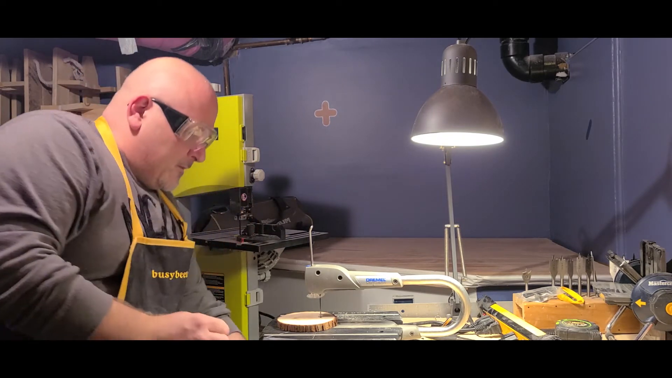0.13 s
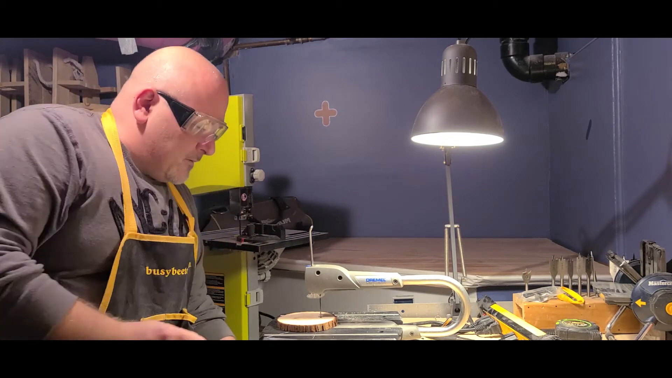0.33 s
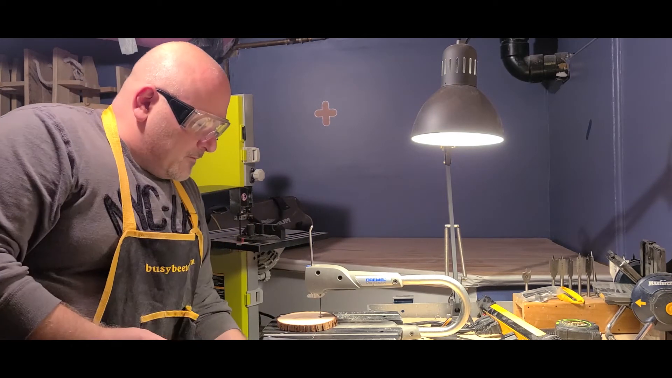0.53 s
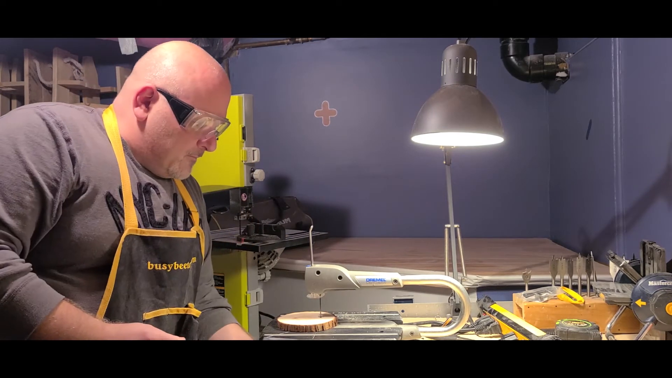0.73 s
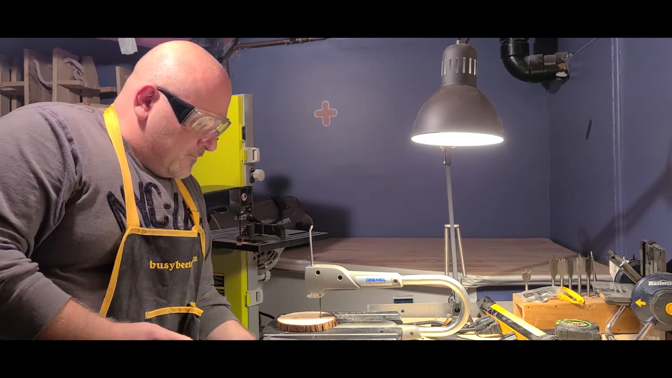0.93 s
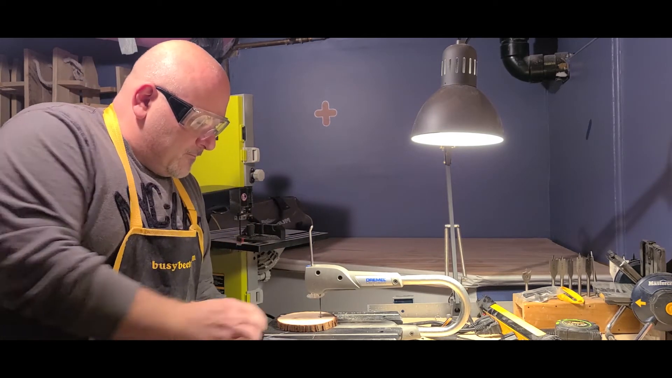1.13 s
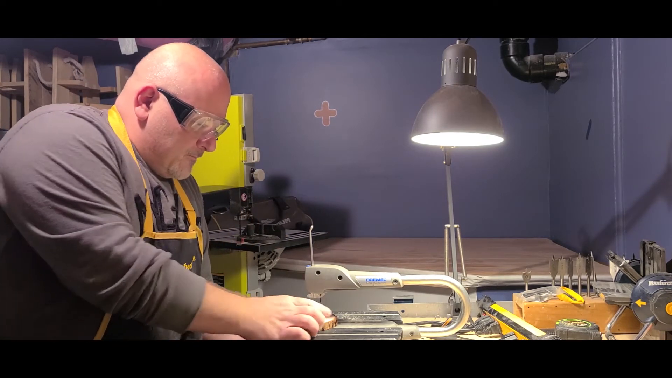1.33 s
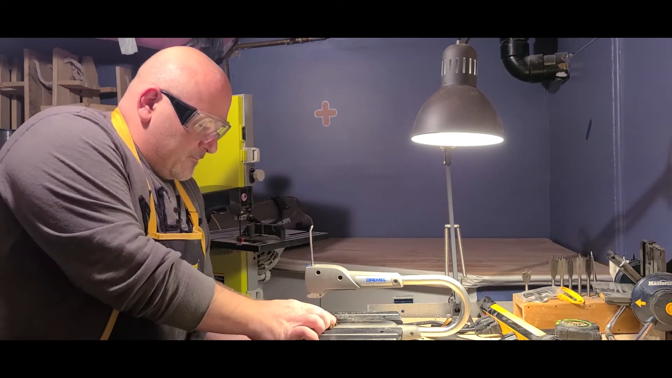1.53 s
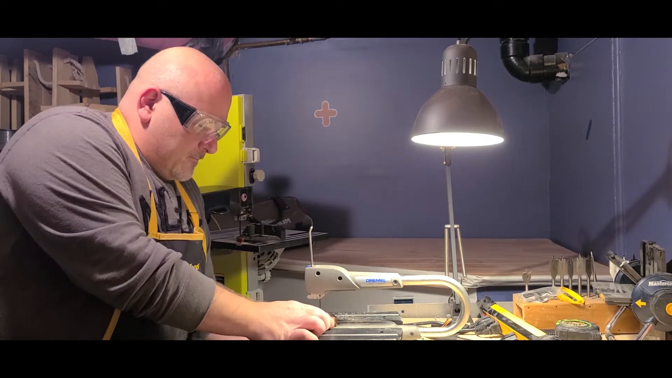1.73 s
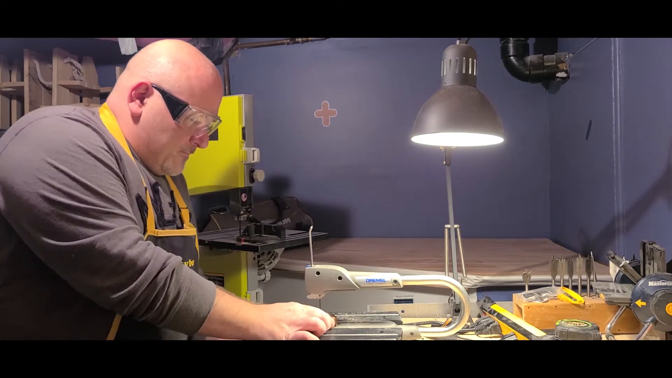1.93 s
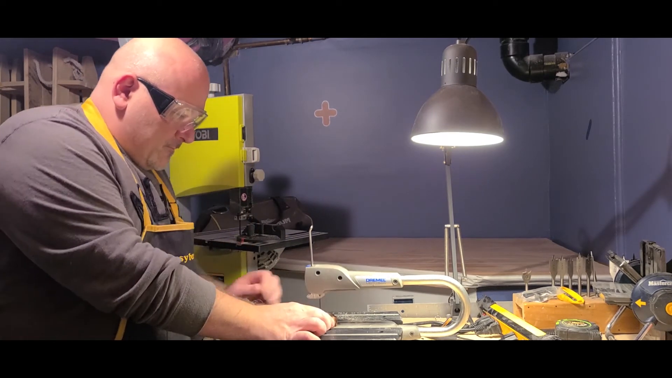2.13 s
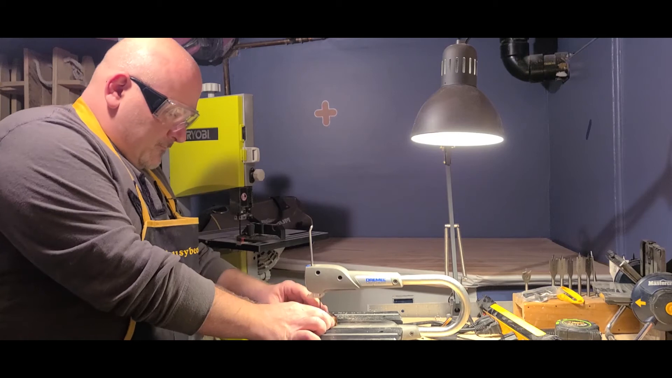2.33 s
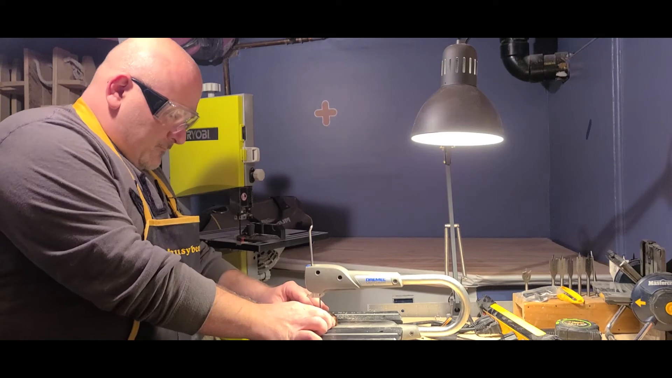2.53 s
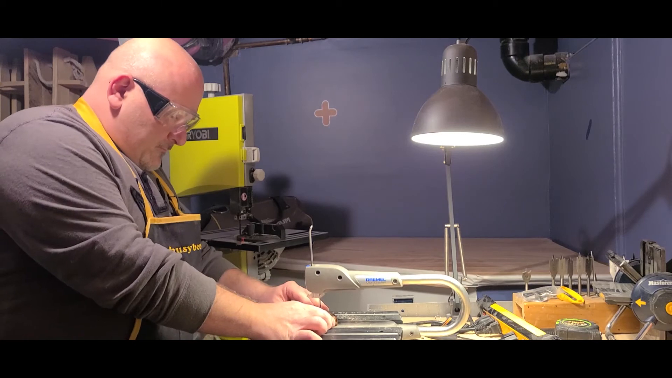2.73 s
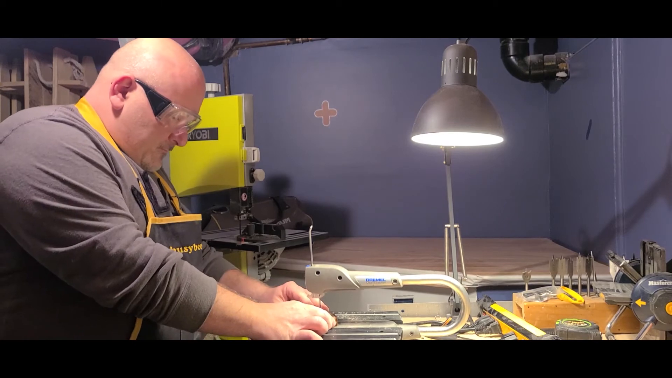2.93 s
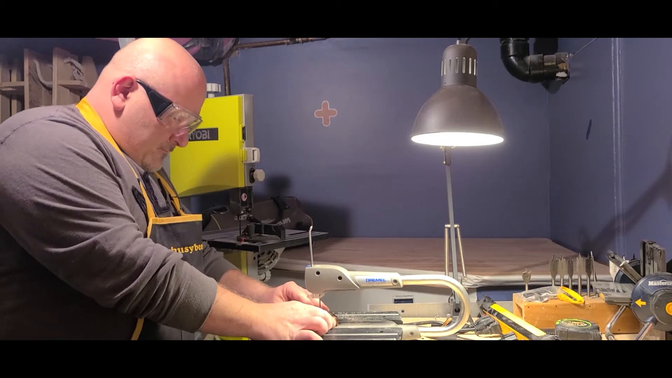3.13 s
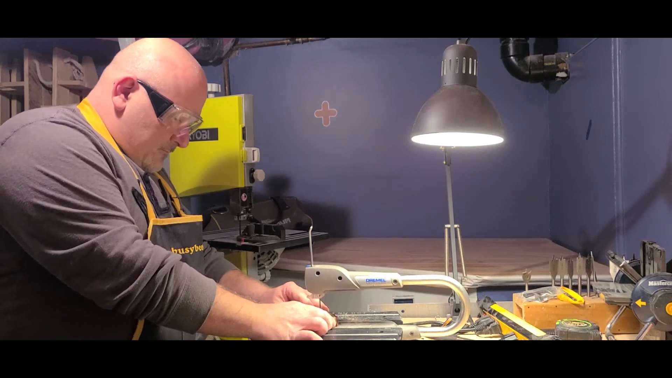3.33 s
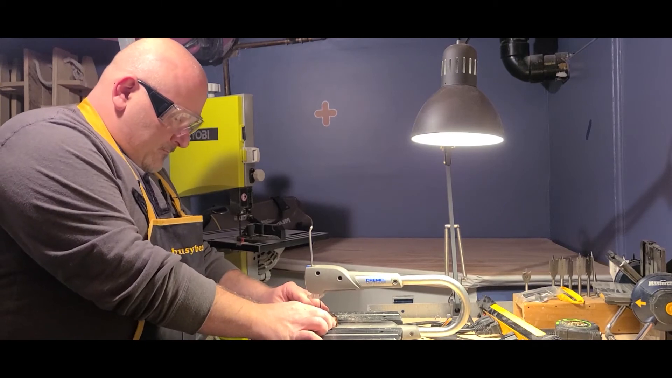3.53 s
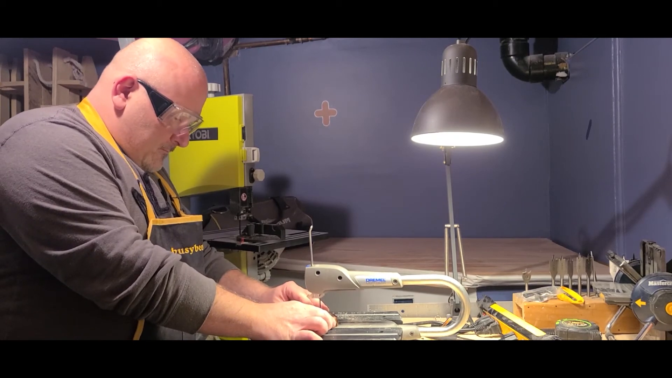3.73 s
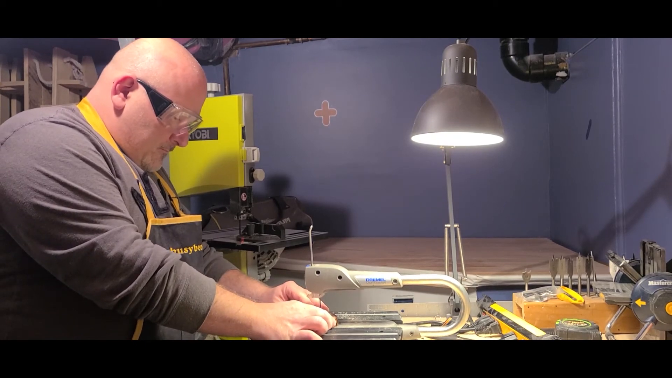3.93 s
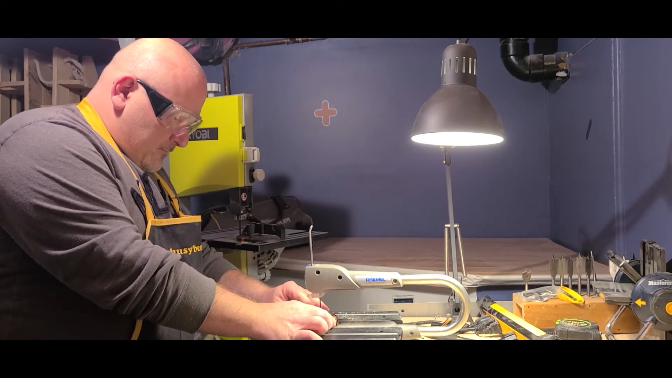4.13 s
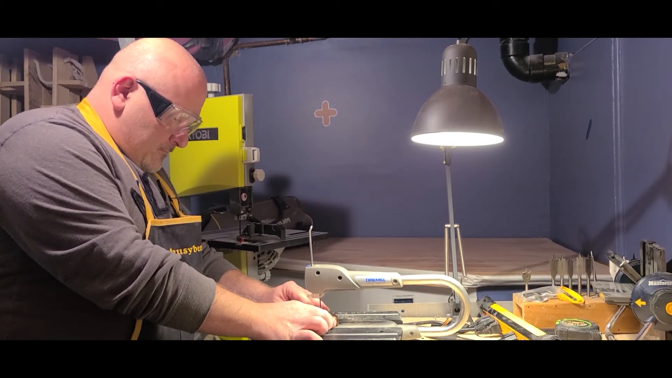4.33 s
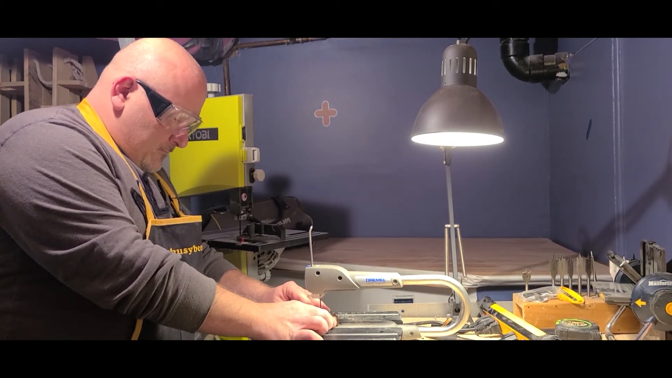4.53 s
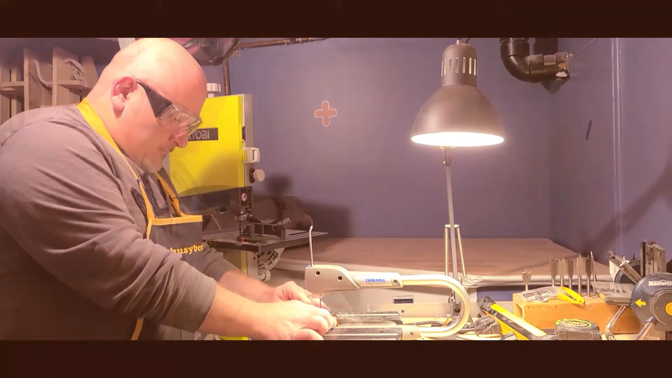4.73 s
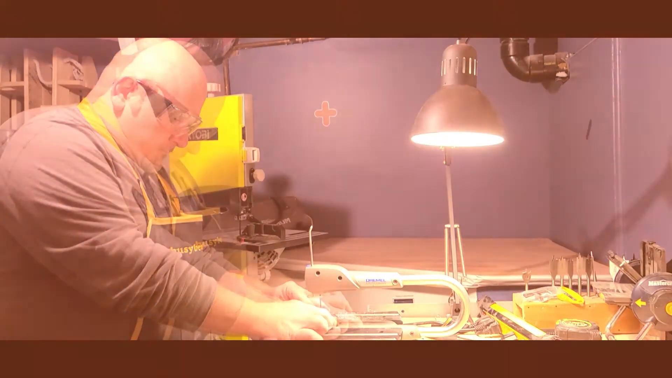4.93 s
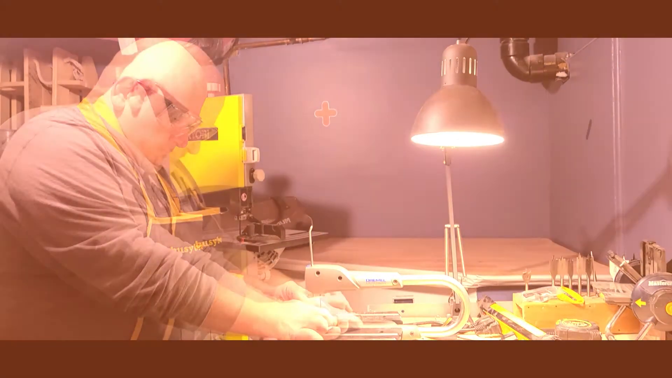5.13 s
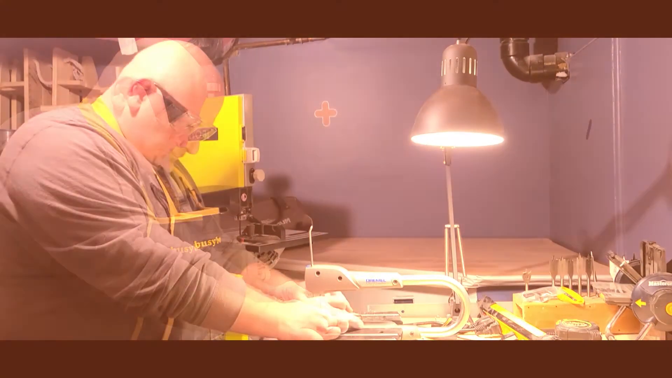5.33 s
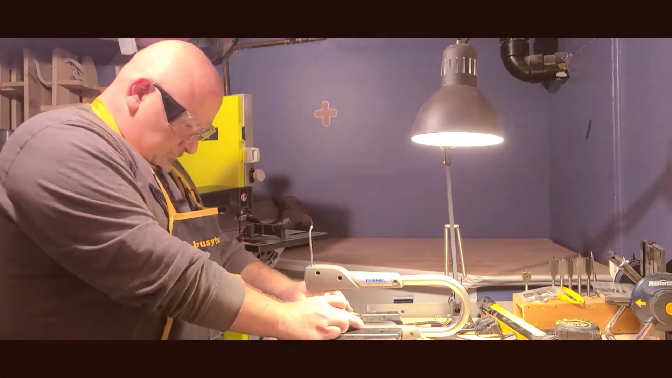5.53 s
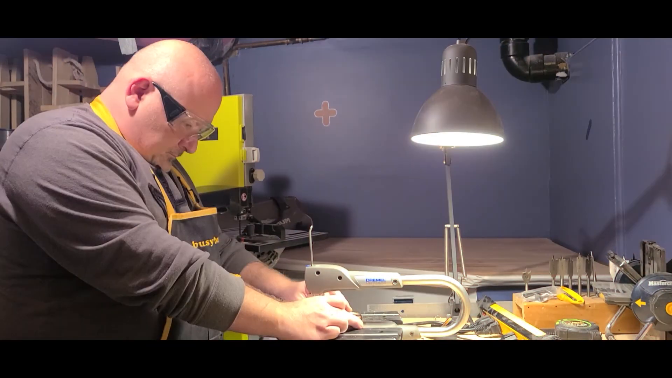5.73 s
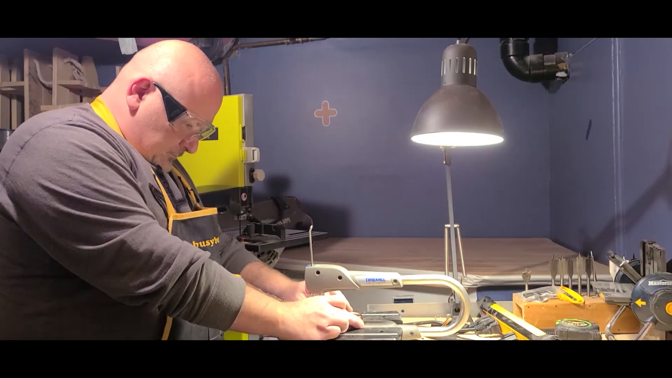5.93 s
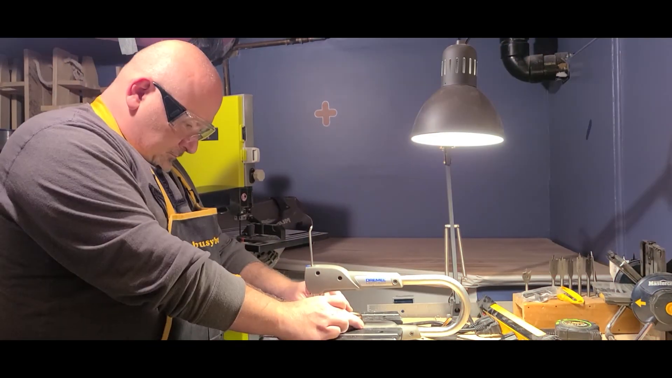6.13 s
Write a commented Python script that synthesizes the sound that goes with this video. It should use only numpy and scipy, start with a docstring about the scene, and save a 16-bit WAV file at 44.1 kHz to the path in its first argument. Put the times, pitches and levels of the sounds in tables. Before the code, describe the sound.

A quiet workshop with faint low room tone and a short, dense echo, heard close in stereo. From 0.07 to 0.3 seconds, soft low thuds on a bench come with clacks, tiny metal clicks and a sleeve swish; weaker bumps and a dull apron rustle continue to about 0.9, with two faint bumps around 1.3 to 1.4. At 1.55 a switch snaps and a motor howls rapidly up to speed. By 1.8 a scroll saw runs steadily at about 29 strokes a second: low bench hum, rattle, metallic chatter, fluttering high whine and a wavering blade note, growing gradually. Light rasping rises near 3.2, table buzz near 4.1, and a strong hollow rasp around 4.6. At 5.09 everything vanishes for about 0.02 seconds. The saw resumes with less low hum; brighter, harsher wood rasps swell at 5.45 and 6.0, slowing the motor slightly.

```python
"""Bumps on a workshop bench come first, with clacks, small clicks and the swish of clothes; then a scroll saw
is switched on and howls up to 29 strokes a second. Its arm shakes the bench, and its drive whines and chatters
with the crank. The blade sings and rasps through a wood slice all through the turn, somewhat harder on the
downstroke. The stronger pushes slow the motor a little, and most set the table buzzing. The sound drops out
once, very briefly, and many layers have other levels afterwards."""
import sys
import numpy as np
from scipy import signal
from scipy.fft import rfft, irfft, next_fast_len
from scipy.io import wavfile
from scipy.ndimage import uniform_filter1d, map_coordinates

SR = 44100
rng = np.random.default_rng(int(sys.argv[2]) if len(sys.argv) > 2 else 0)


def put_to_file(sound):
    """Save the sound as 16-bit audio at rate SR, in the file named by the first command-line argument."""
    columns = np.atleast_2d(sound).T  # one column per channel
    safe = np.clip(columns, -1, 1)
    whole_steps = np.round(safe * 32767)
    wavfile.write(sys.argv[1], SR, whole_steps.astype(np.int16))


N = 273420
TIME = np.arange(N) / SR

SWITCH_ON_S = 1.548
DOWNSTROKE_S = (4.585, 6.024)  # a downstroke before and one after the dropout: turns count from these
DROPOUT_S = (5.086, 5.108)  # start and end of the brief silence
TOP_HZ = 15850  # nothing is kept above this

# How alike left and right are: pitch_hz, likeness (1 = the same)
ALIKE = [(130, .985), (200, .93), (300, .5), (640, .4), (1400, .05), (5000, 0), (7500, .75), (15000, .65)]
# How much louder left is than right: pitch_hz, left_minus_right_db
LEAN = [(60, -3.5), (92, -3.5), (140, -2.0), (210, -1.0), (330, 2.5), (500, -2.0), (770, -3.0), (1170, 0.5),
        (1790, 2.5), (2740, 2.0), (4190, 1.0), (6410, 7.0), (9810, -2.5), (15000, -0.5)]
# Decay of the workshop's echo: pitch_hz, t60_s (time to fall by 60 dB)
WORKSHOP = [(150, 0.1), (1500, 0.24), (12000, 0.054)]
# Tone colour of the quiet room: pitch_hz, density_db (per Hz)
ROOM_TONE = [(15, -33), (25, 0), (64, 0), (120, -16), (270, -10.5), (887, -23), (2280, -29), (2480, -27),
             (2910, -25.5), (3720, -33), (5280, -31.5), (6380, -25), (8590, -41), (16000, -37)]

# Hands bump the bench and the saw: start_s, thud_db, favoured_pitch_hz, clack_db, clack_t60_s
BUMPS = [(0.072, -43, 130, -49.5, 0.4), (0.11, -35.5, 62, -53, 0.17), (.126, -40, 140, -53, .12),
         (0.189, -36, 50, -62, .25), (.275, -39, 74, -64, 0.22), (0.499, -54, 65, -70, .2),
         (.544, -46, 88, -70, .2), (.635, -53, 90, -60, 0.27), (0.698, -53, 110, -73, .2),
         (0.799, -54, 68, -66, 0.24), (0.844, -60, 90, -62, 0.2), (1.304, -53, 75, -83, .1),
         (1.405, -61, 70, -80, .1)]
# Low notes of the bench: pitch_hz, level_db, t60_s
THUD = [(50, -2, 0.16), (74, 0.5, 0.23), (131, -1, .15), (156, 1, 0.23), (249.3, -0.5, 0.37)]
# Tone colour of the light clacks: pitch_hz, density_db (per Hz)
CLACK = [(100, 7), (280, 3), (800, 2), (1100, -13), (2300, -10), (3100, -29), (4200, -22), (7000, -31),
         (15000, -46)]
# Loose metal parts click: start_s, level_db, t60_s
CLICKS = [(.0705, -44.5, .02), (.079, -50, .09), (.11, -59, .04), (.192, -58, .035), (.229, -62, .03),
          (.254, -61, .03), (.627, -70, .03), (.648, -71, .03), (.844, -67, .03)]
# Tone colour of those clicks: pitch_hz, density_db (per Hz)
METAL = [(200, -18), (1000, -8), (1900, -3), (2600, 0), (3000, 10), (3600, -10), (4700, -5), (6000, -16),
         (8000, -21), (15000, -30)]
# A sleeve brushes past: time_s, level_db
SLEEVE = [(.1, -90), (.17, -66), (.21, -54), (.26, -55.5), (.33, -65.5), (.4, -81)]
# Tone colour of the sleeve: pitch_hz, density_db (per Hz)
CLOTH = [(200, 2.5), (900, -2), (1400, 0), (2600, -16), (6000, -22), (15000, -44)]
# An apron rustles dully: time_s, level_db
APRON = [(.58, -86), (.65, -64), (.76, -72), (.85, -65), (.96, -85)]
# Tone colour of the apron: pitch_hz, density_db (per Hz)
CANVAS = [(100, -10), (250, 8), (480, 0), (800, -8.5), (1200, -19), (3000, -30), (12000, -45)]
BLOW_OCTAVES = 0.72  # bench notes this far from a blow's pitch ring half as strongly

# Tone colour of the switch: pitch_hz, density_db (per Hz)
SNAP = [(200, -16), (1500, -15), (3000, 4), (5500, 2), (9000, 3), (16000, -10)]
# Frame resonances that the motor sweeps through: pitch_hz, width_hz, level_db
FRAME = [(774, 70, -25.5), (855, 53, -28), (1315, 30, -22), (1720, 93, -36), (2700, 260, -36),
         (2960, 200, -35)]
HOWL_DELAY_S, HOWL_HOLD_S, HOWL_RELEASE_S = 0.013, 0.17, 0.089  # the motor strains briefly after the switch

# The crank. Pairs here and below hold the value before and after the dropout
STROKE_HZ = 29.2  # typical rate, for placing harmonics and sizing one turn of noise
IDLE_HZ, SAG_HZ, SPIN_UP_S = (29.385, 29.43), .41, .03  # free speed, drop at full load, run-up time constant
FADE_IN_DB, FADE_IN_S = 7.5, 0.89  # the running saw starts this much softer; time constant of its growth
# Share of the contact noise that repeats on every turn, and the pitch where that share halves
REPEAT, REPEAT_HZ = .62, 2600

# A loose panel hums: time_s, level_db
PANEL = [(1.76, -75), (1.85, -44.5), (2.85, -45.5), (3.05, -53), (5.6, -50)]

# Shaking of arm and bench: crank_multiple, before_dropout_db, after_dropout_db, gain_per_effort_db
SHAKE = [(2, -45, -50, 2), (3, -30.3, -37.5, 4.5), (4, -35, -43, .5), (5, -40.5, -51, 5),
         (6, -48, -43, 2.5)]
# Tone colour of the bench's rattle: pitch_hz, density_db (per Hz)
BENCH = [(35, -45), (90, 8.5), (170, -3.5), (240, -11), (290, -4.5), (380, -1), (480, -5), (570, -8.5),
         (900, -8), (2000, -34)]
SWAY_DB, RATTLE_DB = (-47.5, -57), (-38, -38.5)
RATTLE_IDLE_DB, RATTLE_KNEE = -6, 0.13  # softer by this at idle; the load near which it starts in earnest
SHAKE_DELAY_S, SHAKE_RISE_S, SHAKE_START_DB = 0.2, 0.033, -8.5  # the hum is softer at first, then rises
SHAKE_GROWS, SMEAR = (1, 1.7), .3  # effort per load; how far the bench smears a jolt over the turn

# Tone colour of bearings and links: pitch_hz, density_db (per Hz)
CHATTER = [(150, -9.5), (550, -5.5), (720, 1), (1000, -8.5), (1280, 2), (2200, -6), (3200, 0.5),
           (4200, -4.5), (5200, -6.5), (6200, -8.5), (8100, -15.5), (10300, -14.5), (13000, -18.5),
           (15800, -25.5)]
CHATTER_DB, CHATTER_LOAD_DB = (-23, -25.5), -2  # level at idle, change at full load
CHATTER_RISE_S, CHATTER_START_DB = 0.026, -18  # it starts this much softer and rises

# Partials of the drive's whine: crank_multiple, crest_db, ripple_rad, blur_rad, pitch_swing (share),
# highest_at (share of a turn)
PARTIALS = [(51, -27.5, 0.046, 0.15, 0.015, 0.15), (100, -24, 0.089, 0.38, 0.01, 0.3),
            (152, -26.5, 0.27, 0.56, 0.0054, 0.14), (162, -37, 0.097, 0.42, 0.0082, 0.13),
            (202, -27.5, 0.1, .45, .013, 0.18), (207, -40.5, .34, .62, 0.0098, 0.13),
            (250, -39.5, 0.21, .91, .009, .15), (257, -42, .44, 1, 0.0077, 0.23),
            (300, -43, .22, 0.71, 0.0095, 0.16), (350, -47, .18, .9, 0.005, 0.11),
            (404, -38, .13, 0.59, .003, 0.13)]
# Throbs of the partials on every turn: crank_multiple, crest_at (share of a turn), width_turns, level_db,
# left_minus_right_db, gain_at_full_load_db, gain_after_dropout_db, left_right_phase_rad
SWELLS = [(51, .08, .055, -1, 1, 4, 1.5, .7), (51, .42, .045, -1, 2, -2, 2, 2.9),
          (51, .63, .08, 2, 7, -4, -1.5, 1), (51, .88, .07, 0, -3, 2.5, 1, .6),
          (100, .05, .06, -2, 8, 0, -3, 1), (100, .22, .07, .5, 7, -6, -5, .9),
          (100, .52, .05, -4, 1, -2, 0, 2.9), (100, .7, .06, -2, -3, -4, 4.5, 1.2),
          (100, .89, .05, -3, 3, 7, 2, 2), (152, .32, .05, -4, 2, -2, -1, 2.7),
          (152, .64, .06, -1, -1, -2, -2, 1.9), (152, .03, .09, -1, 2, -3, 0, 1.1),
          (162, .1, .25, 0, 2, -2, 0, 1.6), (202, .75, .1, 0, 13, -4, -2.5, 1.2),
          (202, .15, .11, -7.5, 6, -2, 2, 1.2), (207, .2, .2, 0, 8, -3, -1, 1.2),
          (250, .42, .14, 0, 4, 0, 0, .7), (257, 0, .12, 0, 3, -2, 0, .7), (300, .08, .1, 0, -2, -1, 1, .6),
          (300, .68, .1, -1, -2, -3, 1, .6), (350, .98, .15, 0, -2, -1, -1, .6),
          (404, .06, .09, 0, -2, -2.5, -4, .8), (404, .63, .1, -3, -2, -4, -2, .8)]
TROUGH_DB = -19  # level between the swells
WHINE_DELAY_S, WHINE_RISE_S = .065, .11

# The taut blade's own note, with an unsteady level: time_s, level_db
SING = [(1.56, -70), (1.59, -37), (1.65, -44), (2.6, -42), (2.8, -38.5), (3.1, -42), (3.16, -33),
        (3.21, -33.5), (3.24, -41), (4.1, -37.5), (4.55, -34.5), (5.06, -35), (5.15, -38.5), (6.2, -37.5)]
SING_HZ, SING_SAG_HZ, WARBLE_HZ, FLICKER_DB = 828, 38, 22, 2.6  # pitch, drop at full load, wander, flicker

# The slice is pushed into the blade, or the blade meets harder grain: peak_s, rise_s, fall_s, load (0-1),
# rasp_db, brightness (0-1), buzz_db, buzz_tilt_db (per octave)
PUSHES = [(3.19, .27, 0.76, .02, -37, 0, -57, -2), (4.15, 0.33, 0.56, 0.01, -42.5, 0.8, -31, -1),
          (4.678, 0.58, 2.5, 1, -27.5, 0.28, -31, 6.5), (4.57, 0.075, 0.061, 0.01, -32.5, 0.7, -45, 6),
          (5.452, 0.134, 0.1224, .6, -24, 0.59, -34.5, 1.5), (6.011, 0.19, 0.12, 0.84, -23, 0.84, -30.5, 1)]
PUSH_SHAPE, RASP_GROWS = 1.5, 0.93  # roundness of a push; the rasp rises as this power of it
# The table buzzes against the blade: crank_multiple, before_dropout_db, after_dropout_db
BUZZ = [(7, -1, -2), (8, 1, 2.5), (9, -4, -3), (11, -11, -3), (13, 0, -7), (15, -14, -6), (16, -5, -9),
        (19, -4, -7), (20, -11, -2), (24, -4, -6), (27, -1, -5)]
BUZZ_LINE_DB = -8.5  # a strong harmonic, relative to the whole buzz
# The slice slaps the table: at (share of a turn), level_db
SLAPS = [(.96, 0), (.32, -6), (.66, -6)]
SLAP_DB, SLAP_SCATTER_S, SLAP_SCATTER_DB = -2.5, .0006, 2  # level against the rasp; scatter in time and size
# What the slice rings with: pitch_hz, width_hz, level_db
SLICE = [(815, 90, -4), (1120, 130, -3), (1300, 130, 1), (1560, 170, -3)]
# Tone colour of the rasp when the slice sounds hollow: pitch_hz, density_db (per Hz)
HOLLOW = [(50, -47), (170, -19), (400, -4), (620, 4.5), (810, 11.5), (1000, 1), (1350, -8.5), (2000, -16.5),
          (5000, -29), (15000, -62)]
# Tone colour of the rasp when the slice sounds bright: pitch_hz, density_db (per Hz)
BRIGHT = [(50, -34), (180, -4), (320, -13), (600, -2), (850, -9), (1280, 5), (1750, -5), (2600, -7),
          (5000, -13.5), (15000, -51)]


def amp(db):
    """Decibels to gain."""
    return 10 ** (np.asarray(db) / 20)


def unit(x):
    """Scale to an average (rms) level of 1."""
    return x / np.sqrt(np.mean(x ** 2) + 1e-20)


def along(points, hz):
    """Read (pitch, value) points at any pitch, on a log axis."""
    pitch, value = np.transpose(points)
    return np.interp(np.log(hz + 1), np.log(pitch + 1), value)


def curves(rows):
    """One value per sample for each column after the time."""
    s, *columns = np.transpose(rows)
    return [np.interp(TIME, s, column) for column in columns]


def spliced(pair):
    """One value until the end of the dropout, another after it."""
    return np.where(TIME < DROPOUT_S[1], pair[0], pair[1])


def ramp(delay, length):
    """From 0 to 1, starting this long after the switch."""
    return np.clip((TIME - SWITCH_ON_S - delay) / length, 0, 1)


def decay(start, t60, attack):
    """The loudness of one blow: a quick rise, then a fall of 60 dB in t60 seconds."""
    age = np.maximum(TIME - start, 0)
    return amp(-60 * age / t60) * (1 - np.exp(-age / attack))


def wobble(rate):
    """A smooth random curve with this many random points a second."""
    coarse = np.linspace(0, N / SR, N // 10)
    points = rng.standard_normal(int(N * rate / SR) + 4)
    return np.interp(TIME, coarse, map_coordinates(points, [coarse * rate]))


def noise():
    """Two channels of white noise."""
    return rng.standard_normal((2, N))


def filtered(x, response):
    """Multiply the spectrum of x by a function of pitch."""
    size = next_fast_len(N + SR // 2)
    spectrum = rfft(x, size) * response(np.fft.rfftfreq(size, 1 / SR))
    return irfft(spectrum, size)[..., :N]


def resonate(x, modes):
    """Make x ring through resonances given as (pitch, width, level)."""
    def response(f):
        return sum(amp(db) * 1j * f * width / (hz * hz - f * f + 1j * f * width) for hz, width, db in modes)
    return filtered(x, response)


def spread(hz):
    """Half the angle by which the room sets left and right apart."""
    return np.arccos(np.clip(along(ALIKE, hz), -1, 1)) / 2


def coloured(pair, spectrum):
    """Two unrelated signals become one stereo sound of rms 1 with this tone colour."""
    def widen(hz):
        return amp(along(spectrum, hz)) * [np.cos(spread(hz)), np.sin(spread(hz))]

    def lean(hz):
        return amp(np.outer([.5, -.5], along(LEAN, hz)))

    mid, side = filtered(pair, widen)
    return unit(filtered(np.array([mid + side, mid - side]), lean))


def tone(turns, multiple, pan_db, apart=None, lag=None):
    """A stereo sine of rms 1 locked to turns; apart is the left-right phase (rad), lag a share of a cycle."""
    half = spread(multiple * STROKE_HZ) * rng.choice([-1, 1]) if apart is None else apart / 2
    start = rng.random() if lag is None else lag
    angle = 2 * np.pi * (multiple * turns + start)
    gains = np.sqrt(2) * unit(amp([[pan_db / 2], [-pan_db / 2]]))
    return gains * np.sin(angle + half * np.array([[1], [-1]]))


def workshop(x, wet_db):
    """Near walls and clutter add a short, dense tail: noise that dies away at its own pace in each band."""
    hz, t, grid = signal.stft(rng.standard_normal((2, SR // 4)), SR, nperseg=256)
    fading = grid * amp(-60 * t / along(WORKSHOP, hz)[:, None])
    tail = signal.istft(fading, SR, nperseg=256)[1]
    wet = signal.fftconvolve(x, tail / np.linalg.norm(tail[0]), axes=1)[:, :N]
    return (x + amp(wet_db) * wet) / np.hypot(1, amp(wet_db))


def room_tone():
    """The quiet room: soft, steady noise with its own tone colour."""
    return amp(-67.5) * coloured(noise(), ROOM_TONE)


def ring(modes, start, favoured_hz):
    """Notes struck at one moment and dying away, those near the blow's own pitch the strongest."""
    total = 0
    for hz, db, t60 in modes:
        octaves = np.log2(hz / favoured_hz)
        strength = amp(db) / (1 + (octaves / BLOW_OCTAVES) ** 4)
        total = total + strength * decay(start, t60, attack=0.0029) * np.sin(2 * np.pi * hz * (TIME - start))
    return total


def handling():
    """Soft bumps ring the bench's low notes, each with a light clack; metal clicks and clothes swish."""
    thuds = sum(amp(thud_db) * ring(THUD, s, hz) for s, thud_db, hz, clack_db, t60 in BUMPS)
    clacks = sum(amp(clack_db) * decay(s, t60, attack=0.00065) for s, thud_db, hz, clack_db, t60 in BUMPS)
    sleeve_db, = curves(SLEEVE)
    sleeve = amp(sleeve_db + 1.5 * wobble(68.4)) * coloured(noise(), CLOTH)
    apron_db, = curves(APRON)
    apron = amp(apron_db + 2.5 * wobble(60)) * coloured(noise(), CANVAS)
    click_levels = sum(amp(db) * decay(s, t60, attack=.0002) for s, db, t60 in CLICKS)
    clicks = click_levels * coloured(noise(), METAL)
    struck = amp([[-1.5], [1.5]]) * thuds + clicks  # the thuds lean to the right
    return workshop(struck, wet_db=-9.0) + clacks * coloured(noise(), CLACK) + sleeve + apron


def push(peak, rise, fall):
    """One push or hard spot builds and eases; none carries across the end of the dropout."""
    distance = np.abs(TIME - peak) / np.where(TIME < peak, rise, fall)
    return np.exp(-distance ** PUSH_SHAPE) * spliced((peak < DROPOUT_S[1], peak > DROPOUT_S[1]))


def crank(load):
    """Turns of the crank, counted from a downstroke: it runs up and sags under load."""
    age = np.maximum(TIME - SWITCH_ON_S, 0)
    run_up = 1 - np.exp(-age / SPIN_UP_S)
    speed = run_up * (spliced(IDLE_HZ) - SAG_HZ * load)
    turns = np.cumsum(speed * (1 + .0006 * wobble(30))) / SR
    return turns - spliced(np.interp(DOWNSTROKE_S, TIME, turns))


def stroke(turns, at, sharp):
    """A swell of rms 1 once a turn, peaking at the given share of it."""
    return unit(np.exp(sharp * np.cos(2 * np.pi * (turns - at))))


def contacts(turns):
    """Rough surfaces meet again on every turn: their coarse, low noise repeats, the fine treble is new."""
    size = int(SR / STROKE_HZ)
    place = turns % 1 * size
    worn = [map_coordinates(rng.standard_normal(size), [place], mode="grid-wrap") for channel in range(2)]

    def share(hz):
        return REPEAT / (1 + (hz / REPEAT_HZ) ** 2)

    repeating = filtered(np.array(worn), lambda hz: np.sqrt(share(hz)))
    fresh = filtered(noise(), lambda hz: np.sqrt(1 - share(hz)))
    return repeating + fresh


def spin_up(turns):
    """The switch snaps and the motor howls up to speed through the frame's resonances."""
    shaky = turns + .0016 * wobble(220)
    low = amp(2 * wobble(120)) * tone(shaky, 50, pan_db=0)
    high = amp(3 * wobble(170)) * tone(shaky, 100, pan_db=0)
    strain = ramp(HOWL_DELAY_S, 0.011) - ramp(HOWL_HOLD_S, HOWL_RELEASE_S)
    howl = resonate(strain * (low + high), FRAME)
    snap = amp(-19.5) * decay(SWITCH_ON_S, t60=0.026, attack=0.0002) * coloured(noise(), SNAP)
    return workshop(howl, wet_db=-5.0) + snap


def panel(turns):
    """A loose panel hums at eight times the crank rate."""
    level_db, = curves(PANEL)
    return amp(level_db) * tone(turns, 8, pan_db=-1)


def shake(turns, load):
    """The arm's momentum rocks the bench, which smears the jolts into a hum; loose parts rattle more under load."""
    start_db = SHAKE_START_DB * (1 - ramp(SHAKE_DELAY_S, SHAKE_RISE_S))
    sway = amp(spliced(SWAY_DB)) * tone(turns, 0.91, pan_db=-4.0)
    effort = spliced(SHAKE_GROWS) * load
    hum = 0
    for k, before, after, load_db in SHAKE:
        level_db = spliced((before, after)) + load_db * effort + .6 * wobble(9.6)
        hum = hum + amp(level_db) * tone(turns, k, pan_db=-3, lag=SMEAR * (k - 3) ** 2)
    loose = amp(RATTLE_IDLE_DB * np.exp(-(load / RATTLE_KNEE) ** 2))
    rattle = loose * amp(spliced(RATTLE_DB)) * coloured(contacts(turns), BENCH)
    return sway + amp(start_db) * hum + rattle


def chatter(turns, load):
    """Bearings, links and the blade in its guide chatter through the metal frame."""
    start_db = CHATTER_START_DB * (1 - ramp(0, CHATTER_RISE_S))
    level_db = spliced(CHATTER_DB) + CHATTER_LOAD_DB * load + start_db
    flickering = amp(1.3 * wobble(900)) * contacts(turns)
    return amp(level_db) * coloured(flickering, CHATTER)


def throb(turns, load, multiple):
    """Stereo loudness and left-right phase of one partial: it swells at the same points of every turn."""
    power = weight = amp(TROUGH_DB) ** 2
    angle = 0
    for k, at, width, db, pan_db, load_db, later_db, apart in SWELLS:
        if k == multiple:
            bump = np.exp((np.cos(2 * np.pi * (turns - at)) - 1) / (2 * np.pi * width) ** 2)
            # before the dropout the load sets the change in level, after it a fixed step does
            swell = bump * amp(db + spliced((load_db * load, later_db))) ** 2
            power = power + swell * unit(amp([[pan_db / 2], [-pan_db / 2]])) ** 2
            weight = weight + swell
            angle = angle + swell * apart
    return np.sqrt(power), angle / weight


def whine(turns, load):
    """The drive whines about 50 times a stroke, and its overtones throb and bend in step with the crank."""
    unsteady = turns + .0004 * wobble(40)
    total = 0
    for k, db, ripple, blur, swing, highest in PARTIALS:
        swung = unsteady + swing * np.sin(2 * np.pi * (turns - highest)) / (2 * np.pi)
        # uneven teeth ripple the pitch alike on every turn; play in the drive blurs it
        teeth = sum(np.sin(2 * np.pi * (n * turns + rng.random())) for n in range(3, 8))
        bend = (ripple * teeth + blur * wobble(330)) / (2 * np.pi * k)
        rough = unit(1 + .5 * blur * wobble(330))
        envelope, apart = throb(turns, load, k)
        partial = tone(swung + bend, k, pan_db=1.0, apart=apart * rng.choice([-1, 1]))
        total = total + amp(db) * envelope * rough * partial
    return ramp(WHINE_DELAY_S, WHINE_RISE_S) * total


def sing(load):
    """The blade's own note warbles and flickers, and sinks as the wood presses on it."""
    level_db, = curves(SING)
    hz = SING_HZ - SING_SAG_HZ * load + WARBLE_HZ * wobble(70)
    flicker = unit(amp(FLICKER_DB * wobble(55)))
    return amp(level_db) * flicker * tone(np.cumsum(hz) / SR, 1, pan_db=-3, apart=.8)


def buzz(turns):
    """Most pushes set the table buzzing on the harmonics of the stroke, some deeper, some higher."""
    pushes = [(push(s, rise, fall), db, tilt_db) for s, rise, fall, *_, db, tilt_db in PUSHES]
    total = 0
    for k, before, after in BUZZ:
        octaves = np.log2(k / 13)  # the tilt pivots on the thirteenth harmonic
        drive = np.sqrt(sum((shape * amp(db + tilt_db * octaves)) ** 2 for shape, db, tilt_db in pushes))
        line_db = spliced((before, after)) + BUZZ_LINE_DB + 1.3 * wobble(5.1)
        total = total + drive * amp(line_db) * tone(turns, k, along(LEAN, k * STROKE_HZ))
    return total


def slaps(turns):
    """The blade lifts the slice and drops it on the table a few times a turn, and the slice rings; rms 1."""
    blows = np.zeros(N)
    for share, db in SLAPS:
        at = np.flatnonzero(np.diff(np.floor(turns - share)) > 0)  # samples where the crank passes this point
        late, size = rng.standard_normal((len(at), 2)).T
        moment = at + (late * SLAP_SCATTER_S * SR).astype(int)
        blows[np.clip(moment, 0, N - 1)] = amp(db + SLAP_SCATTER_DB * np.tanh(size))
    return unit(workshop(resonate(blows[None], SLICE), wet_db=-1))


def cut(turns):
    """The teeth tear fibres all through the turn, somewhat harder on the downstroke; the slice slaps the table."""
    bite = unit(1 + .25 * stroke(turns, at=.01, sharp=4.5))
    fibres = bite * contacts(turns)
    hollow, clear = coloured(fibres, HOLLOW), coloured(fibres, BRIGHT)
    rasp = total_level = 0
    for s, rise, fall, force, db, bright, *_ in PUSHES:
        level = amp(db) * push(s, rise, fall) ** RASP_GROWS
        rasp = rasp + level * unit(hollow + np.clip(bright, 0, 1) * (clear - hollow))
        total_level = total_level + level
    return workshop(rasp, wet_db=-10) + amp(SLAP_DB) * total_level * slaps(turns)


def scene():
    """The stronger pushes load the motor; crank angle and load drive the parts of the saw, over the quiet room."""
    load = sum(force * push(s, rise, fall) for s, rise, fall, force, *_ in PUSHES)
    turns = crank(load)
    fade_in = amp(-FADE_IN_DB * np.exp(-np.maximum(TIME - SWITCH_ON_S, 0) / FADE_IN_S))
    running = fade_in * (shake(turns, load) + chatter(turns, load) + whine(turns, load))
    saw = spin_up(turns) + panel(turns) + running + sing(load) + buzz(turns) + cut(turns)
    return room_tone() + handling() + ramp(0, 0.0023) * saw


def record(dry):
    """The sound drops out for a moment, with softened edges; nothing is kept above the top pitch."""
    live = uniform_filter1d(1. * ((TIME < DROPOUT_S[0]) | (TIME > DROPOUT_S[1])), size=24)
    return filtered(dry * np.maximum(live, amp(-58.5)), lambda hz: hz < TOP_HZ)


dry = scene()
out = record(dry)
put_to_file(out)
```